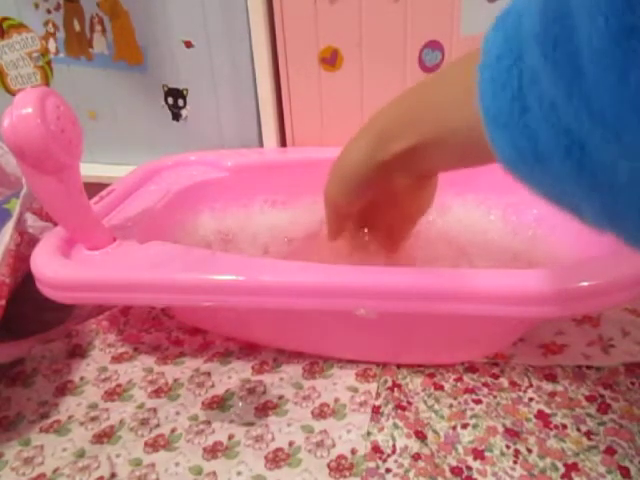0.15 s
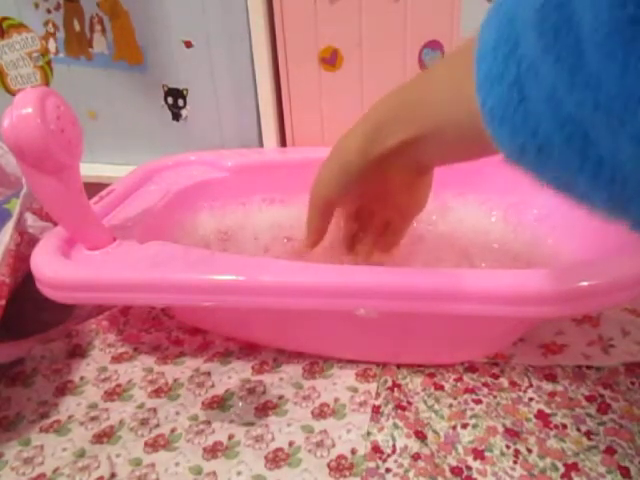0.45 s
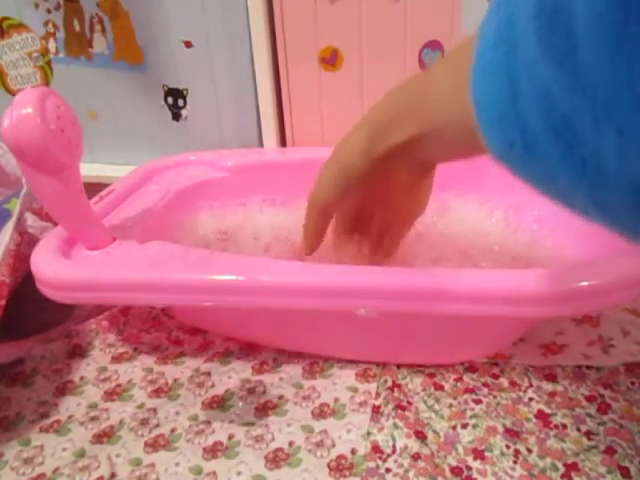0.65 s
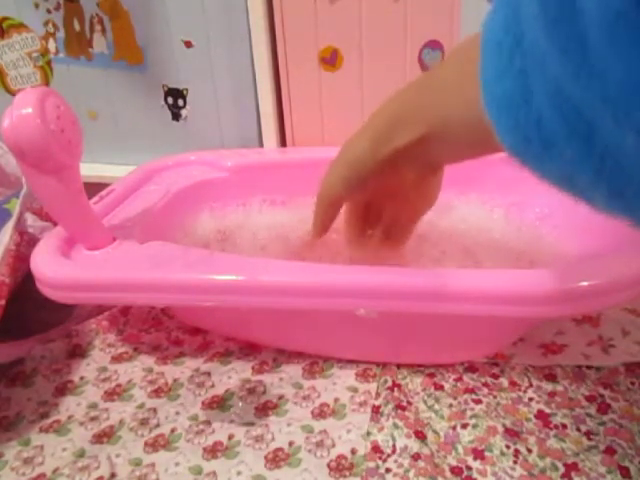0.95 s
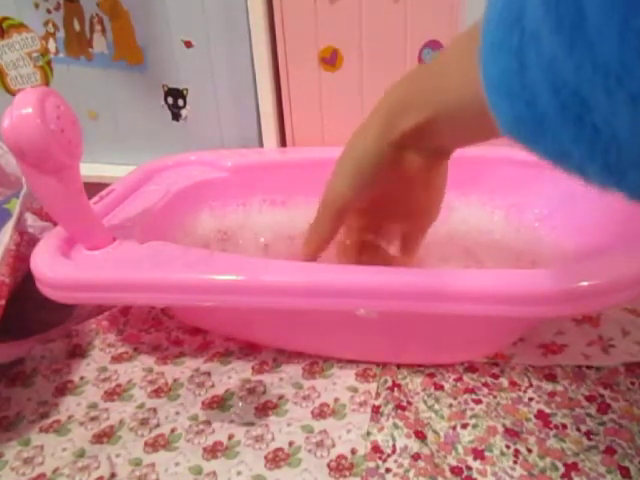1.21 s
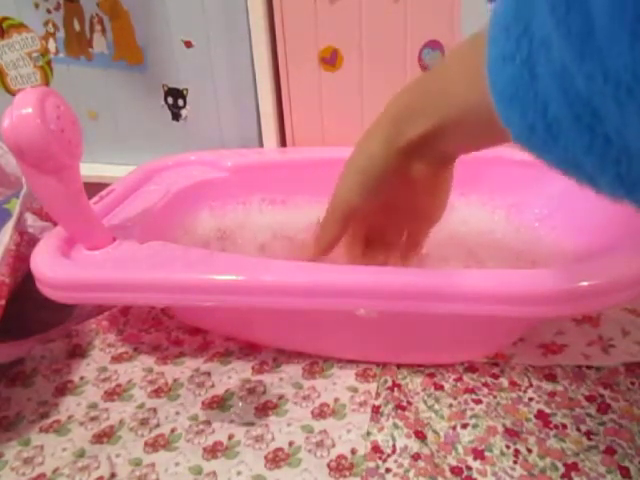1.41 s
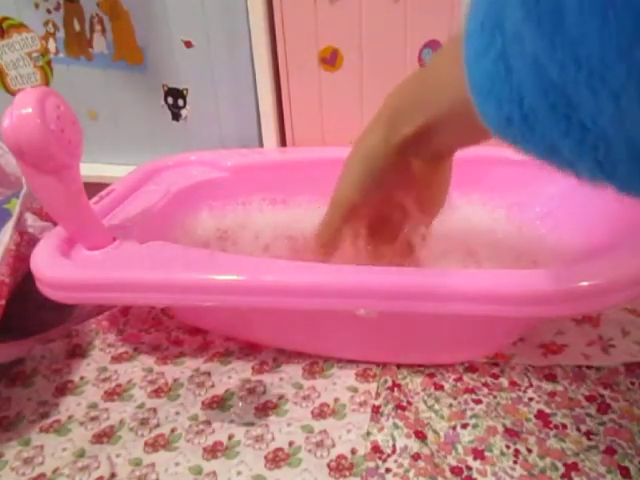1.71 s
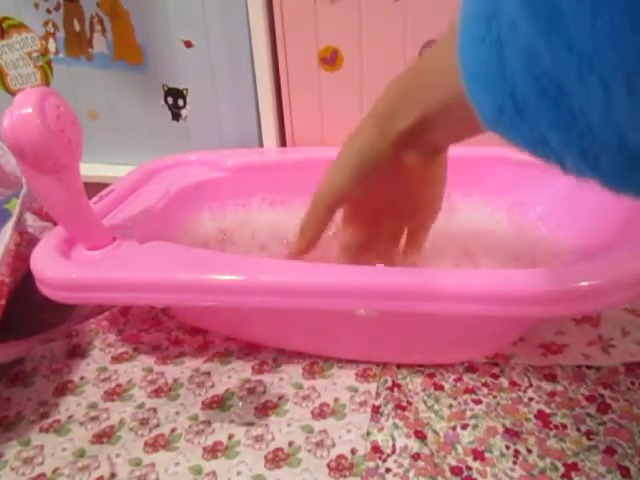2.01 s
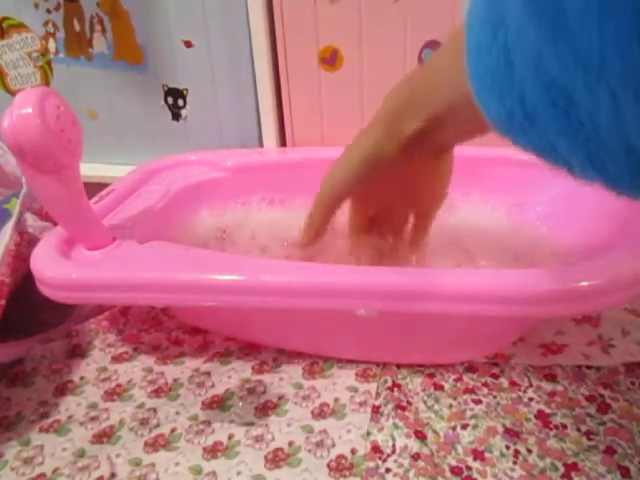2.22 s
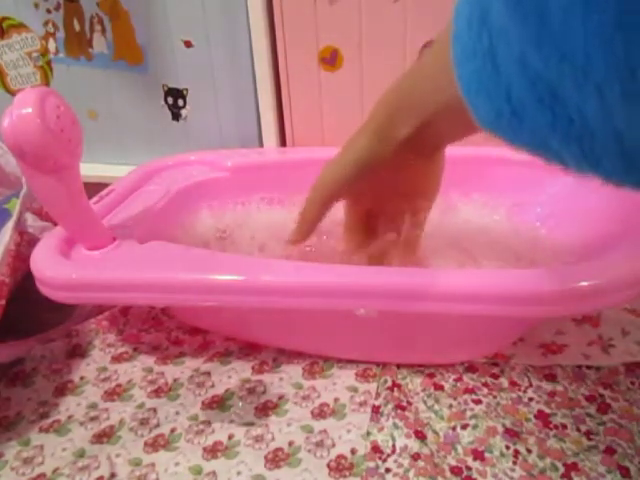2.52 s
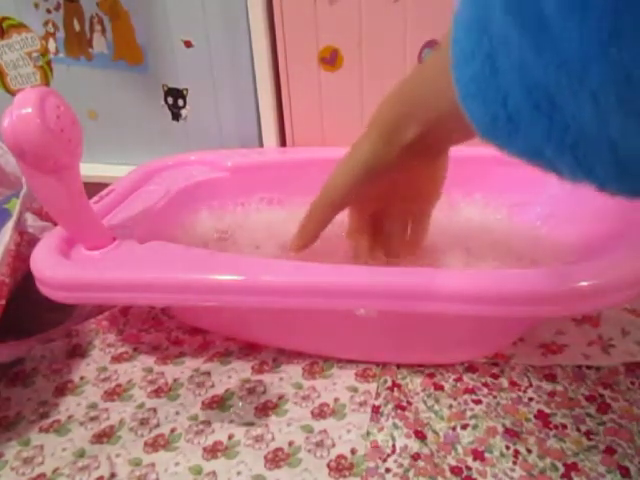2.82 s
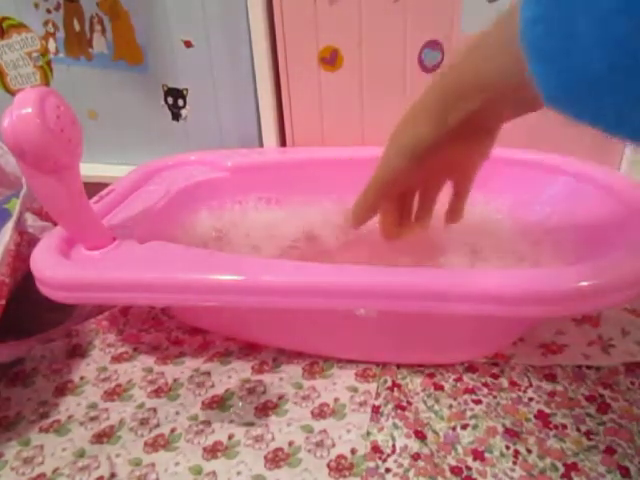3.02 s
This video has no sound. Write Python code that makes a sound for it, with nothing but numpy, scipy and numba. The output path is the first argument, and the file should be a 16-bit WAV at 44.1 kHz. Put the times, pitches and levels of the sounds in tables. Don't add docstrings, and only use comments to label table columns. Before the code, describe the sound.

A hand swishes shallow soapy water in a small plastic tub, close up indoors. Light trickling bubbles begin, with sharp plops near 0.5 and 0.85 seconds, the latter with a rising gulp. From 1.6 stirring gets brisker: dense gurgles, fizz and droplet clicks, a deep thump near 2.2, the strongest splash and knock about 2.6. After 2.9 it drops away to faint room hum.

```python
import sys
import numpy as np
from scipy import signal
from scipy.fft import rfft, irfft
from scipy.io import wavfile
from scipy.ndimage import uniform_filter1d
from numba import njit

SR = 44100
rng = np.random.default_rng(int(sys.argv[2]) if len(sys.argv) > 2 else 0)


def makeup_ratio(level_db):
    decades = np.asarray(level_db, float) / 20
    return 10 ** decades


def inscribe(sig):
    pcm = np.round(np.clip(np.atleast_2d(sig).T, -1, 1) * 32767)
    wavfile.write(sys.argv[1], SR, pcm.astype(np.int16))


N = 138915
RISE = .05


def curve_db(points, hz):
    points = np.array(points, float)
    return np.interp(np.log(hz), np.log(points[:, 0]), points[:, 1])


def set_rms(x, db):
    return x * makeup_ratio(db) / np.sqrt(np.mean(x ** 2))


def walk(rate_hz):
    hold = int(SR / rate_hz)
    steps = np.repeat(rng.standard_normal(N // hold + 1), hold)
    smooth = uniform_filter1d(uniform_filter1d(steps, hold), hold)
    return 2.84 * smooth[:N]


@njit
def ring(start_s, hz, tau_s, size, rise, swell, n, sr):
    out = np.zeros(n)
    for k in range(len(start_s)):
        i0 = int(start_s[k] * sr)
        phase = 0.
        du = 1 / (tau_s[k] * sr)
        fade, fade_step = size[k], np.exp(-du)
        unswelled, swell_step = 1., np.exp(-du / swell)
        for j in range(min(int(6 / du) + 2, n - i0)):
            phase += min(hz[k] * (1 + rise[k] * j * du), .45 * sr) / sr
            fade *= fade_step
            unswelled *= swell_step
            out[i0 + j] += fade * (1 - unswelled) ** 2 * np.sin(2 * np.pi * phase)
    return out


def grains(s, hz, cycles, db, rise, swell):
    columns = np.broadcast_arrays(s, hz, cycles, db, rise)
    s, hz, cycles, db, rise = (np.ravel(v) * 1. for v in columns)
    tau_s = np.clip(cycles, .5, 40) / hz / np.log(10)
    return ring(np.maximum(s, 0), hz, tau_s, makeup_ratio(db), rise, max(swell, .01), N, 1. * SR)


def burst(s, db, hz, cycles, lead_db, swell, spread_s, octaves, train_db, count):
    shape = (len(s), count)
    u = rng.random(shape)
    pitch_g, cycles_g, size_g = (rng.standard_normal(shape) for _ in range(3))
    late = -np.log(1 - u)
    train_hz = np.clip(hz[:, None] * 2 ** (octaves * pitch_g), 300, 15000)
    size_db = db[:, None] + train_db - 4 * late + 3.36 * size_g
    train_s = s[:, None] + late * spread_s
    train = grains(train_s, train_hz, cycles * 2 ** (.5 * cycles_g), size_db, RISE, swell)
    lead = grains(s, hz, cycles, db + lead_db, RISE, swell)
    return lead + train


# [t/s, level/dB]
STIR_EFFORT = [(0, -45.5), (.4, -40), (1.0, -35.5), (1.45, -34), (1.55, -43), (1.652, -28.5), (2.1, -36.5),
               (2.3, -32.5), (2.82, -31), (2.95, -59), (3.15, -54.5)]


def stirring():
    return makeup_ratio(np.interp(np.arange(N) / SR, *np.array(STIR_EFFORT, float).T))


# [f/Hz, level/dB per Hz]
ROOM_SPECTRUM = [(30, -53), (70, -15.5), (110, -5), (170, -19.5), (300, -23), (600, -30), (5000, -38),
                 (15000, -49.5)]
ROOM_DB = -48.5
HUM_HZ, HUM_DB = 46.4, -47


def room():
    hz = np.arange(N // 2 + 1) * SR / N + 1
    spectrum = rfft(rng.standard_normal(N)) * makeup_ratio(curve_db(ROOM_SPECTRUM, hz))
    return set_rms(irfft(spectrum, N), ROOM_DB)


def appliance_hum():
    hz = HUM_HZ * (1 + 0.0027 * walk(2.74))
    return makeup_ratio(HUM_DB + walk(18)) * np.sin(2 * np.pi * np.cumsum(hz) / SR)


SLOSH_HZ, SLOSH_DB = 144.6, -11.5


def slosh():
    band_hz = [SLOSH_HZ / 2.29, SLOSH_HZ * 1.283]
    boom = signal.lfilter(*signal.butter(2, band_hz, "band", fs=SR), rng.standard_normal(N))
    return set_rms(boom, SLOSH_DB) * stirring()


# [f/Hz, level/dB]
BED_SPECTRUM = [(350, -44), (620, -6.5), (1000, 2.5), (1550, -1.5), (2300, 7.5), (3600, 3), (5000, 0),
                (7000, -11.5)]


def bed(lo_hz, hi_hz, cycles, scatter_db, clump_db, db, count):
    when, pitch, size, damping = rng.random((4, count))
    hz = lo_hz * (hi_hz / lo_hz) ** pitch
    clump = walk(40.226)[(when * (N - 1)).astype(int)]
    size_db = curve_db(BED_SPECTRUM, hz) - scatter_db * np.log(1 - .97 * size) + clump_db * clump
    bubbles = grains(when * N / SR, hz, cycles * 4 ** (damping - .5), size_db, RISE, 0.14)
    return stirring() * set_rms(bubbles, db)


# [t/s, level/dB, f/Hz]
PLOPS = [(0.268, -16, 1130), (0.527, -8, 1008), (0.677, -24, 794), (0.745, -18.5, 755), (0.929, -25, 610),
         (1.076, -22, 997), (1.271, -17, 893), (1.396, -17.5, 746), (1.443, -12.5, 1075), (1.484, -20, 780),
         (1.615, -8.5, 933), (1.754, -11.5, 1020), (1.799, -11, 623), (2.088, -13, 1376),
         (2.128, -27, 1070), (2.191, -19.5, 1164), (2.22, -3.5, 992), (2.277, -17.5, 516),
         (2.294, -14.5, 506), (2.412, -15.5, 1006), (2.472, -19, 540), (2.547, -6.5, 1136), (2.61, -9, 584),
         (2.689, -9, 1005), (2.751, -15.5, 900), (2.852, -6, 806), (2.958, -18, 1334),
         (0.032, -23, 1033), (0.402, -26, 781), (0.449, -20, 963), (0.602, -22.5, 965),
           (0.882, -21.5, 891), (1.095, -23, 994), (1.651, -15.5, 780), (1.856, -16, 1100),
           (1.991, -21, 1000), (2.239, -13.5, 767), (2.552, -14.5, 491), (2.716, -18, 1020)]


def air_pockets():
    pockets = np.array(PLOPS).astype(float).T
    s, db, hz = pockets
    plops = burst(s, db, hz, 8.4, -3.5, 0.24, .012, 0.291, -12.5, count=6)
    slap = grains(s, hz * 0.79, 1.31, db - 3, RISE, 0.22)
    return plops + slap


# [t/s, level/dB, f/Hz]
FINGER_BUBBLES = [(0.0569, -16, 2020), (0.1314, -16.5, 1574), (0.2358, -15, 2430), (0.2685, -18.5, 2200),
                  (0.2848, -10, 2340), (0.378, -12, 3100), (0.406, -15.5, 1800), (0.4403, -10.5, 2250),
                  (0.526, -4, 2820), (0.6, -14, 2250), (0.627, -14, 1610), (0.763, -14.5, 2560),
                  (0.846, -11, 2070), (1.0187, -7, 2010), (1.076, -11.5, 2870), (1.215, -19, 2400),
                  (1.2422, -15, 2390), (1.3381, -15, 1435), (1.481, -12, 2330), (1.5008, -8.5, 2450),
                  (1.575, -14.5, 2040), (1.6132, -10, 2240), (1.6592, -16.5, 1410), (1.683, -13.5, 2480),
                 (1.7284, -13.5, 2370), (1.8015, -2.5, 1430), (1.8144, -7, 2030), (1.8709, -9.5, 2200),
                 (1.991, -19.5, 2040), (2.148, -15.5, 1780), (2.1909, -14, 3050), (2.3175, -12, 1960),
                 (2.3292, -8, 1426), (2.426, -14.5, 2880), (2.4835, -3.5, 2680), (2.562, -8, 2270),
                 (2.5764, -11, 1670), (2.609, -9, 1930), (2.6813, -12, 2780), (2.7294, -8.5, 2440),
                 (2.797, -14, 1610), (2.816, -14.5, 1570), (2.8517, -5.5, 1760),
                  (.329, -21, 4500), (0.4466, -16, 2380), (.6924, -12.5, 3740), (0.837, -11, 6700),
        (1.1584, -23.5, 4550), (1.5748, -19.5, 3330), (1.6424, -18, 5540), (1.6521, -16, 5330),
        (1.683, -17, 4340), (1.7464, -11.5, 2030), (1.757, -10, 2270), (1.798, -15, 4160),
        (1.874, -22, 4730), (1.887, -24, 3370), (2.016, -10.5, 4500), (2.0292, -7, 4720),
        (2.2114, -19.5, 3440), (2.2565, -20, 2000), (2.343, -21, 1710), (2.4395, -21, 3700),
        (2.448, -22, 2140), (2.5834, -11, 4100), (2.6204, -16, 1990), (2.739, -11, 4060),
        (2.7415, -14, 2060), (2.752, -21, 4930), (2.814, -11, 2640), (2.835, -24, 3650), (2.732, -10, 4300),
        (1.38, -16, 2260)]


def finger_bubbles():
    s, db, hz = np.array(FINGER_BUBBLES).astype(float).T
    return burst(s, db, hz, 7.0, -1.35, 0.17, 0.005, 0.3, -10.5, count=6)


# [mid t/s, length/ms, droplet level/dB]
STROKES = [(0.083, 30, -40), (0.204, 11.7, -30.5), (0.369, 69, -30.5), (0.534, 15, -47), (0.686, 47, -32),
           (0.847, 49, -32), (1.017, 39.5, -36), (1.089, 22, -29.5), (1.18, 96, -48), (1.248, 38, -30.5),
           (1.35, 46, -31), (1.49, 38, -28.5), (1.617, 46, -24.5), (1.658, 31, -24.5), (1.81, 32.5, -26),
           (1.879, 57, -26.5), (2.027, 29, -28.5), (2.149, 47, -30), (2.242, 77, -23), (2.361, 58, -28),
           (2.473, 19.6, -27.5), (2.566, 37, -25), (2.62, 67, -18.5), (2.686, 18, -27.5), (2.739, 48, -28),
           (2.896, 10.7, -32)]


def froth(count=200):
    s, ms, db = np.array(STROKES, float).T[:, :, None]
    u1, u2, pitch, size, damping = rng.random((5, len(s), count))
    place = u1 + u2 - 1
    hz = 1400 * 9.9 ** pitch
    size_db = db - 10.0 - 3.11 * np.log(1 - .99 * size) - 5 * np.log2(hz / 4000)
    return grains(s + .6 * ms / 1000 * place, hz, 8 * 4 ** (damping - .5), size_db, RISE, 0.51)


# [t/s, level/dB]
SPRAYS = [(0.074, -38), (0.0853, -32.5), (0.1062, -51), (0.1993, -36), (0.205, -28), (0.2685, -33),
          (0.3582, -19), (0.3661, -22), (0.415, -31), (0.4294, -27), (0.4905, -30.5), (0.5262, -8.5),
          (0.5353, -17.5), (0.5995, -32), (0.65, -33), (0.67, -30), (0.6858, -34), (0.7123, -27),
          (0.7484, -34), (0.82, -27), (0.8362, -15), (0.8462, -22), (0.856, -19.5), (0.9278, -25.5),
          (0.9655, -30), (1.0111, -29.5), (1.1595, -26.5), (1.174, -17), (1.2412, -24), (1.3194, -29),
          (1.3578, -22), (1.4395, -28), (1.485, -15.5), (1.592, -36), (1.6074, -25), (1.6194, -30),
          (1.6514, -20), (1.6806, -25), (1.8153, -44), (1.8704, -40), (1.8937, -28.5), (2.0238, -23),
          (2.138, -20.5), (2.158, -28), (2.223, -23.5), (2.353, -19.5), (2.365, -37), (2.4513, -33),
          (2.476, -24.5), (2.5486, -36), (2.575, -18), (2.609, -12.5), (2.6314, -22), (2.686, -32),
          (2.726, -24), (2.8335, -35), (2.854, -15), (2.8957, -16.5)]


def film_snaps():
    s, db = np.array(SPRAYS, float).T
    hz = np.full(len(s), 8000.)
    return burst(s, db, hz, 6.94, -0.5, 0.7, 0.0033, 0.577, 2.4, count=16)


# [t/s, level/dB, f/Hz]
DROPS = [(0.2041, -19, 4680), (0.2986, -23, 3950), (0.375, -17.5, 4550), (0.528, -15, 4450),
         (0.6821, -16.5, 4440), (0.846, -10.5, 5000), (1.02, -15.5, 3910), (1.176, -17.5, 5160),
         (1.481, -17.5, 4560), (1.8135, -17, 4520), (2.0454, -9.5, 3860), (2.155, -15, 4140),
         (2.356, -8, 4500), (2.5645, -16.5, 4630), (2.6147, -9.5, 4600)]


def falling_drops():
    s, db, hz = np.array(DROPS, float).T
    return burst(s, db, hz, 9.5, 4.4, 0.2, 0.005, 0.35, -5, count=5)


# [t/s, level/dB, f/Hz]
THUMPS = [
    (0.532, -35, 236),
    (1.74, -46, 154),
    (2.232, -26, 121),
    (2.616, -21, 292),
    (2.626, -21.5, 142.7),
    (2.861, -33, 206),
    (0.929, -31.5, 334),
]


def wall_thumps():
    s, db, hz = np.array(THUMPS, float).T
    return grains(s, hz, 7, db, RISE, .3)


# [t/s, f/Hz, cycles, level/dB, pitch gain]
GULP = (.8565, 1380, 8, 15, .22)


def gulp():
    return grains(*GULP, swell=4.)


# [f/Hz, level/dB]
TUB_MODES = [(780, 1), (1000, 4.5), (2250, -18), (2750, -31)]
TUB_T60_S, ECHO_T60_S, ECHO_DB = 0.075, 0.34, -19


def tail():
    t = np.arange(SR // 2) / SR

    def unit(h):
        return h / np.sqrt(np.sum(h ** 2))

    near = rng.standard_normal(len(t)) * makeup_ratio(-60 * t / 0.0049) * (t > .0005)
    echo = signal.lfilter(*signal.butter(1, 4000, fs=SR), rng.standard_normal(len(t)))
    echo = echo * makeup_ratio(-60 * t / ECHO_T60_S) * (t > .003)
    modes = sum(makeup_ratio(db) * np.cos(2 * np.pi * hz * t) for hz, db in TUB_MODES)
    basin = modes * makeup_ratio(-60 * t / TUB_T60_S) * 7 / (TUB_T60_S * SR)
    return unit(near) * makeup_ratio(-15.5) + unit(echo) * makeup_ratio(ECHO_DB) + basin


def scene():
    water = bed(342.7, 7715, 10.1, 4.6, 1.86, -3.53, count=6000)
    water += bed(4050, 16100, 11.7, 9.7, 2.8, -14.5, count=2500)
    water += air_pockets() + finger_bubbles() + froth() + film_snaps()
    water += falling_drops() + wall_thumps() + gulp()
    ringing = signal.fftconvolve(water, tail())[:N]
    background = room() + appliance_hum() + slosh()
    return (water + ringing + background)[None, :]


def low_pass(x):
    return signal.sosfilt(signal.butter(12, 16370, fs=SR, output="sos"), x)


def record(dry):
    dull = signal.sosfilt(signal.butter(16, 14750, fs=SR, output="sos"), dry)
    mix = np.tanh(0.48 * dull) / 0.35
    return low_pass(mix)


dry = scene()
out = record(dry)
inscribe(out)
```